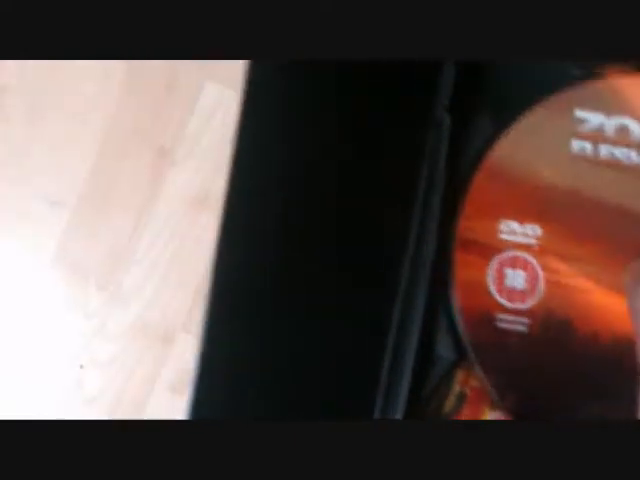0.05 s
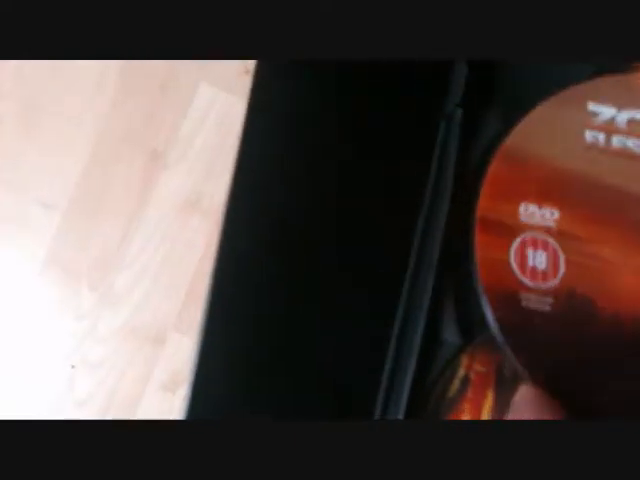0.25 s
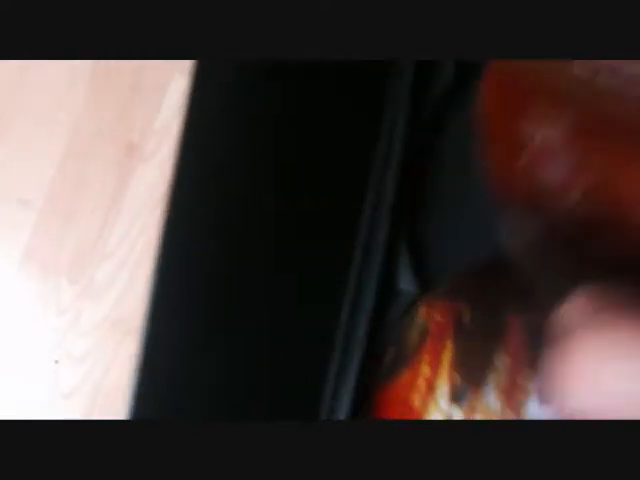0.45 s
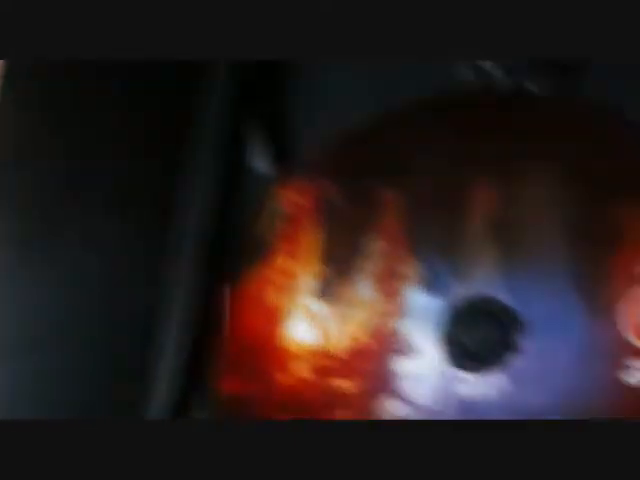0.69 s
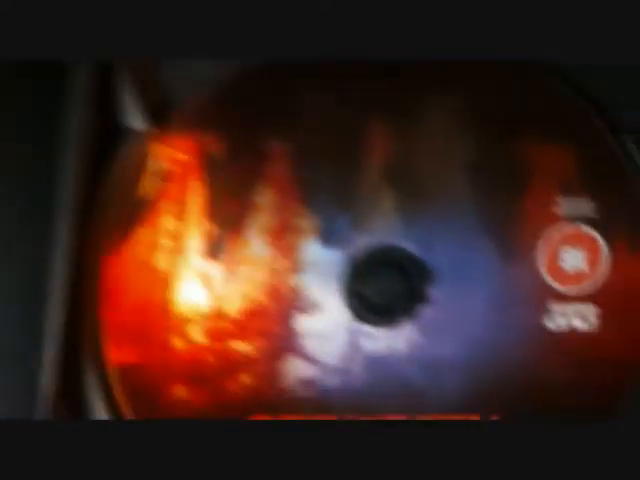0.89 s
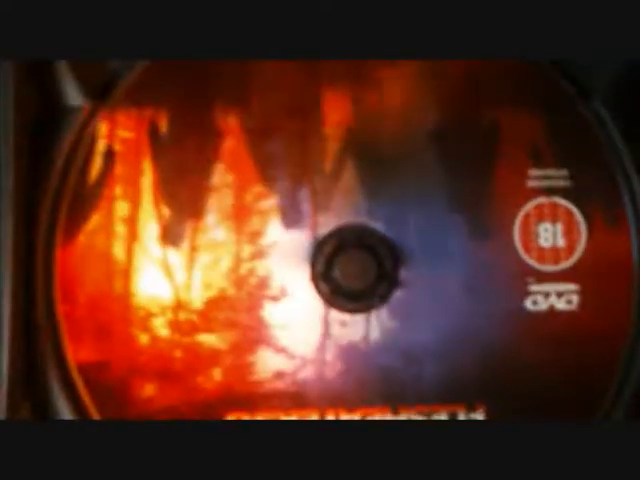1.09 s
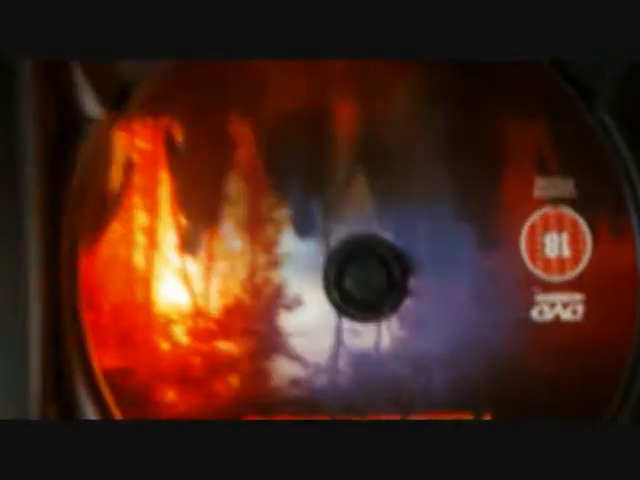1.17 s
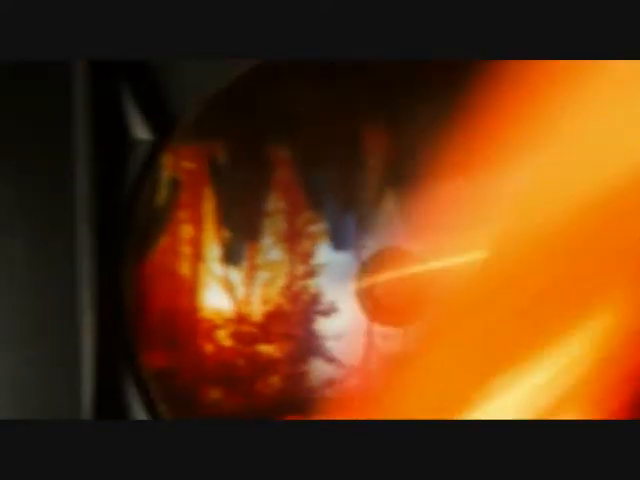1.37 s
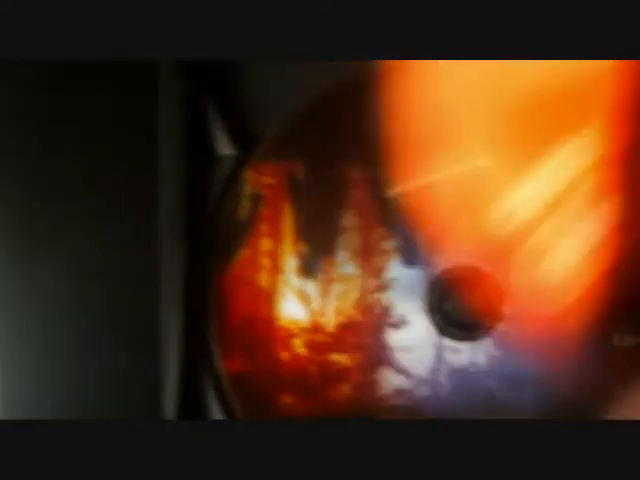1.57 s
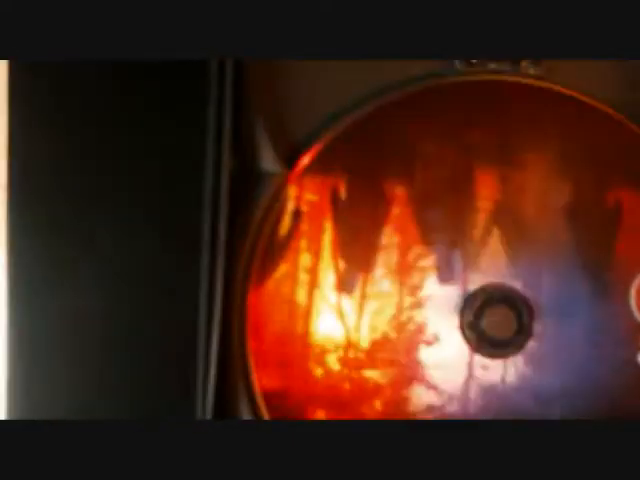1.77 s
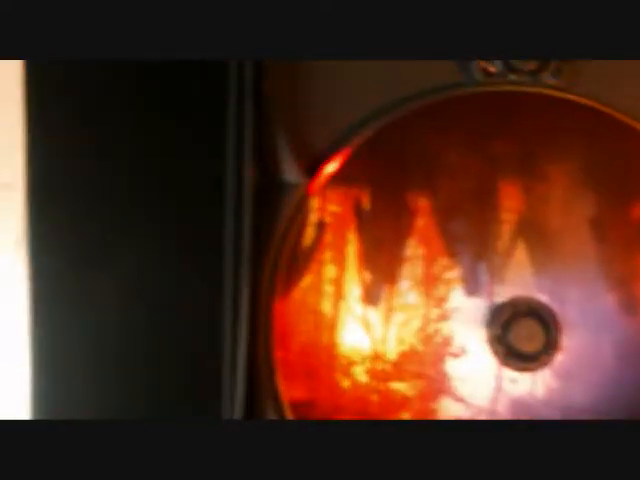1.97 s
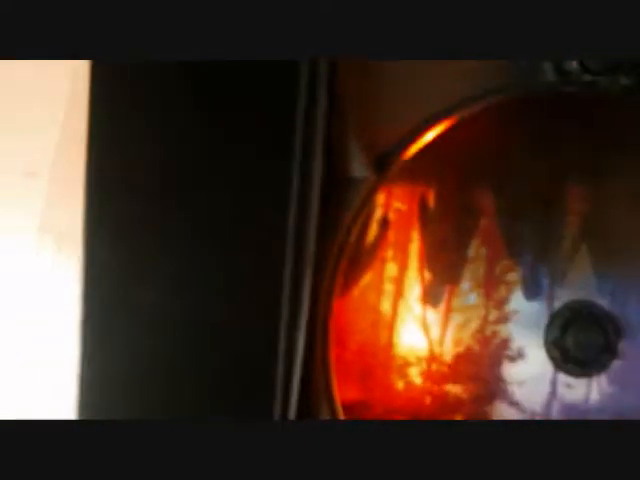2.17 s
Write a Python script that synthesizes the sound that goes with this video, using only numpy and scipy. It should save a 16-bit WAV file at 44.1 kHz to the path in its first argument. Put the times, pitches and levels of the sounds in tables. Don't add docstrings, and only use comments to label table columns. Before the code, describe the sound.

A plastic disc snaps off the hub of its case with a hard, crackly pop and low thump; after faint finger creaks, a disc clicks back in. Close small microphone, quiet room, gritty low-grade sound.

```python
import sys
import numpy as np
from scipy import signal
from scipy.io import wavfile

SR = 44100
rng = np.random.default_rng(int(sys.argv[2]) if len(sys.argv) > 2 else 0)


def voltage_ratio(decibels):
    exponent = np.asarray(decibels, float) / 20
    return 10 ** exponent


def file_out(sig):
    cols = np.atleast_2d(sig).T
    lim = np.clip(cols, -1, 1)
    pcm = np.round(lim * 32767).astype(np.int16)
    wavfile.write(sys.argv[1], SR, pcm)


N = 97020


def rms_one(x):
    return x / np.sqrt(np.mean(x ** 2) + 1e-20)


def band(x, edges_hz):
    return signal.sosfilt(signal.butter(2, edges_hz, "band", fs=SR, output="sos"), x)


def first_order(x, hz, kind):
    return signal.sosfilt(signal.butter(1, hz, kind, fs=SR, output="sos"), x)


def resonance(x, hz, width_hz):
    r = np.exp(-np.pi * width_hz / SR)
    feedback = [1, -2 * r * np.cos(2 * np.pi * hz / SR), r * r]
    return signal.lfilter(np.array([1, 0, -1]) * (1 - r * r) / 2, feedback, x)


def shape(length_s, t, attack_s, fade_s):
    return np.minimum(t / attack_s, 1) * np.exp(-np.maximum(t - length_s, 0) / fade_s)


def add(out, s, x):
    i = int(s * SR)
    out[i:i + len(x)] += x[:N - i]


def quiet():
    white = rng.standard_normal((4, N + SR))
    rumble = rms_one(band(white[0], (8, 29.4))[SR:])
    air = rms_one(band(white[1], (53.9, 918))[SR:])
    hiss = rms_one(first_order(white[2, SR:], 3715, "high"))
    drone = rms_one(band(white[3], (40.8, 130.3))[SR:])
    return voltage_ratio(-59.5) * rumble + voltage_ratio(-55.5) * air + voltage_ratio(-50.5) * hiss + voltage_ratio(-60) * drone


# [t/s, level/dB, length/s, f/Hz]
FINGER_CREAKS = [
    (0.05, -51.5, 0.0057, 2080),
    (0.084, -52.5, 0.065, 2377),
    (0.174, -54, 0.071, 2180),
    (0.563, -59.5, .004, 7330),
    (0.834, -56, 0.077, 3870),
    (0.941, -52, 0.0057, 5180),
    (1.411, -54.5, 0.016, 2516),
    (1.413, -56, 0.0098, 6680),
    (1.960, -55.5, 0.068, 496),
]


def creaks():
    sharpness, hiss_db = 8, 1.5
    out, t = np.zeros(N), np.arange(SR // 5) / SR
    for s, db, length_s, hz in FINGER_CREAKS:
        slips = rng.standard_normal(len(t)) * (rng.random(len(t)) < .1)
        tone = rms_one(resonance(slips, hz, hz / sharpness))
        hiss = rms_one(band(slips, (1500, 7500)))
        sound = tone + voltage_ratio(hiss_db) * min(hz / 2500, 1) * hiss
        add(out, s, voltage_ratio(db) * sound * shape(length_s, t, attack_s=0.0035, fade_s=0.012))
    return out


def body(teeth, modes, band_hz):
    widen, strike_spread_db, broad_db = 4.5, 3, 5
    strengths = rng.normal(0, strike_spread_db, len(modes))
    rings = np.zeros(len(teeth))
    for k, ((hz, width_hz, db), own_db) in enumerate(zip(modes, strengths)):
        width_hz = max(width_hz, 30)
        ring = resonance(teeth, hz, widen * width_hz) / np.sqrt(width_hz)
        rings += voltage_ratio(db + own_db) * (-1) ** k * ring
    return rms_one(rms_one(rings) + voltage_ratio(broad_db) * rms_one(band(teeth, band_hz)))


# [f/Hz, width/Hz, level/dB]
TRAY_MODES = [
    (1057, 33, -4),
    (1320, 93, 1.5),
    (1680, 43, -2.5),
    (1917, 5, 0),
    (2240, 180, 6),
    (2950, 48, -4.5),
    (3213, 13, -3),
]


def tray(teeth):
    boom = rms_one(band(teeth, (149.7, 625)))
    return body(teeth, TRAY_MODES, (463, 3970)) + voltage_ratio(-11) * boom


# [f/Hz, width/Hz, level/dB]
HUB_MODES = [
    (4070, 31, 0),
    (4136, 100, 2.5),
    (5260, 58, -6),
    (6130, 24, -16),
    (5785, 9.3, -1.5),
    (5990, 66, -6.5),
    (6740, 68, -1.5),
    (7520, 83, -4),
]


def hub(teeth):
    return body(teeth, HUB_MODES, (2800, 13700))


def room(x):
    level_db, t60_s, gap_s, wall_cut_hz = -8.5, 0.096, 0.0022, 5000
    t = np.arange(SR // 4) / SR
    tail = rng.standard_normal(len(t)) * voltage_ratio(-60 * t / t60_s) * np.minimum(t / gap_s, 1)
    tail = first_order(tail, wall_cut_hz, "low")
    wet = voltage_ratio(level_db) * signal.fftconvolve(x, tail / np.sqrt(np.sum(tail ** 2)))
    return wet + np.pad(x, (0, len(wet) - len(x)))


# [t/s, level/dB, chatter length/s, hub over tray/dB, loudest ring f/Hz]
DISC_OFF = [(0.2418, -29.5, 0.003, -3.5, 6800), (.2476, -11, 0.0058, -1, 5610),
            (.2535, -13, 0.0051, 5.5, 2240), (0.2564, -7, 0.0038, 3.5, 6370),
            (0.2583, -12.5, .004, -3.5, 1020), (0.265, -12, 0.0025, -7, 4240),
            (0.267, -15.5, 0.0028, 6, 2860), (0.273, -16, 0.0044, -4.5, 6740),
            (0.279, -22, 0.011, 4.5, 2260), (0.29, -34, 0.024, 10, 6500), (0.309, -30, 0.0069, 7.5, 2230),
            (0.316, -29, .004, -3, 6370), (0.332, -32, 0.0018, -7, 1820),
            (.3350, -22.5, 0.0017, -1.5, 1690), (0.3378, -20.5, 0.0015, -0.5, 2440),
            (.3400, -27, 0.0034, 5, 4760)]
# [t/s, level/dB, chatter length/s, hub over tray/dB, loudest ring f/Hz]
DISC_ON = [(1.8256, -22, 0.00046, 3, 4350), (1.845, -50, 0.0074, 9, 7700),
           (1.8494, -31.5, 0.00084, 8, 1230), (1.8655, -14, 0.0055, 1.5, 6020),
           (1.872, -14.5, 0.0053, -2.5, 7330), (1.8868, -25, 0.0038, -15.5, 1910),
           (1.8915, -10, 0.0019, 5.5, 1320), (1.8965, -17.5, 0.0052, -10, 5960),
           (1.9, -14, 0.0055, 16, 6740), (1.9090, -18, 0.011, -10, 1520), (1.9128, -17, 0.0033, 5, 6400),
           (1.9190, -16, 0.0026, 9.5, 6500), (1.923, -18.5, .003, -1.5, 1360), (1.929, -32, .016, 5, 1740),
           (2.1945, -50, 0.0043, 30.5, 4620), (2.1983, -28.5, 0.001, 8, 3230)]


def snaps():
    teeth_per_s, tooth_spread_db, first_tooth_db = 5000, 4, 9
    attack_s, ring_db = 0.0004, 1
    out, t = np.zeros(N), np.arange(SR // 10) / SR
    for s, db, length_s, bright_db, ring_hz in DISC_OFF + DISC_ON:
        sizes = voltage_ratio(tooth_spread_db * np.minimum(rng.exponential(1, len(t)), 4))
        sizes = sizes * rng.choice([-1, 1], len(t))
        envelope = shape(length_s, t, attack_s, fade_s=0.002)
        touching = rng.random(len(t)) < teeth_per_s / SR
        teeth = sizes * touching * envelope + 1e-18
        teeth[int(attack_s * SR)] = voltage_ratio(first_tooth_db)
        ring = rms_one(resonance(teeth, ring_hz, 150 + 0.07 * ring_hz))
        sound = voltage_ratio(-bright_db / 2) * tray(teeth) + voltage_ratio(bright_db / 2) * hub(teeth) + voltage_ratio(ring_db) * ring
        add(out, s, voltage_ratio(db - 3.5) * room(sound) * np.sqrt(np.mean(envelope ** 2)))
    return out


THUMP_TIMES = [.2478, .2585, 1.8660, 1.8900]
# [level/dB, length/s]
AIR_PUSHES = [
    (-13, 0.01),
    (-17, 0.0095),
    (-28, 0.0077),
    (-25.5, 0.0063),
]


def thumps():
    out, t = np.zeros(N), np.arange(SR // 10) / SR
    for s, (db, length_s) in zip(THUMP_TIMES, AIR_PUSHES):
        add(out, s, -voltage_ratio(db) * shape(length_s, t, attack_s=0.00033, fade_s=0.0026))
    return out


def scene():
    return (quiet() + creaks() + snaps() + thumps())[None]


STEPS = 128
UP, DOWN = 160, 441


def resample(x, up, down, edge_hz):
    taps = signal.firwin(DOWN * 40 + 1, edge_hz, fs=SR * UP, window=("kaiser", 7))
    return signal.resample_poly(x, up, down, axis=1, window=taps)


def band_limit(x):
    return signal.sosfilt(signal.butter(12, 8800, fs=SR, output="sos"), x)


def record(dry):
    duck_per_level, duck_release_s, overload, offset_steps = 4.4, 0.18, 0.9, -0.069
    x = first_order(dry, 5.8, "high")
    r = np.exp(-1 / (duck_release_s * SR))
    loudness = signal.lfilter([1 - r], [1, -r], np.abs(dry))
    x = x / (1 + duck_per_level * loudness)
    x = x + voltage_ratio(-2) * resonance(x, 7985, 1100)
    x = overload * np.tanh(x / overload)
    x = resample(x, UP, DOWN, edge_hz=9000)
    x = np.floor(np.clip(x, -1, 1) * STEPS + offset_steps) / STEPS
    mix = resample(x, DOWN, UP, edge_hz=7640)[:, :N]
    return band_limit(mix)


dry = scene()
out = record(dry)
file_out(out)
```